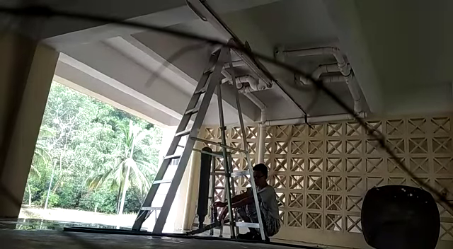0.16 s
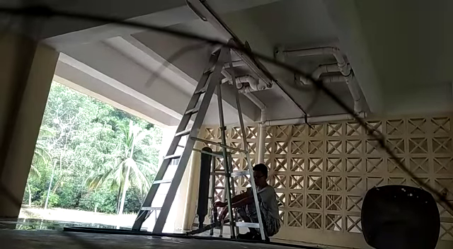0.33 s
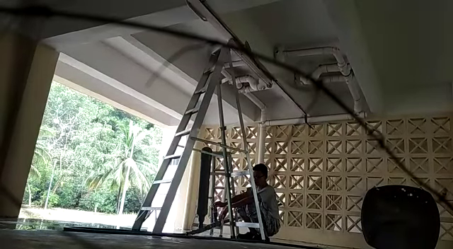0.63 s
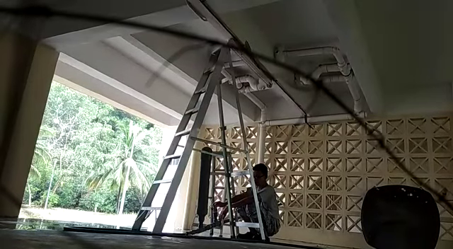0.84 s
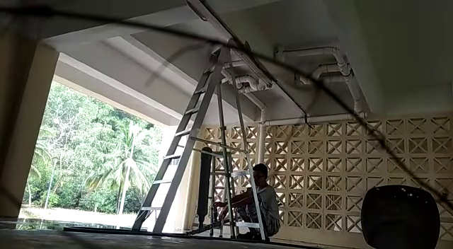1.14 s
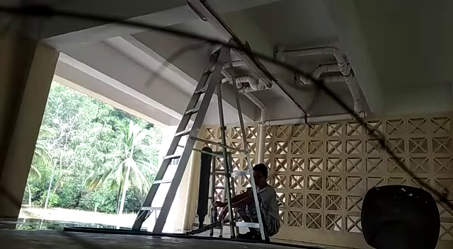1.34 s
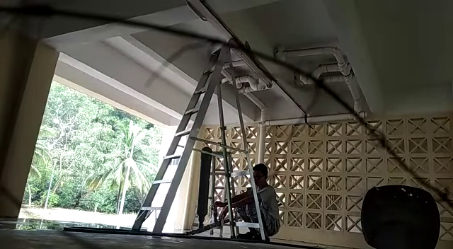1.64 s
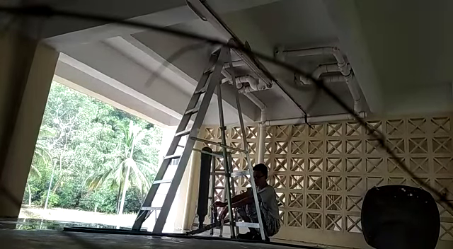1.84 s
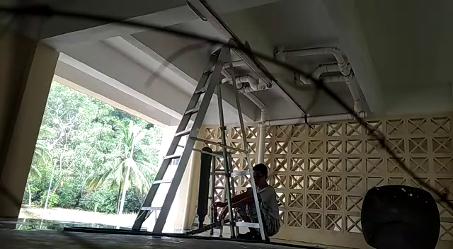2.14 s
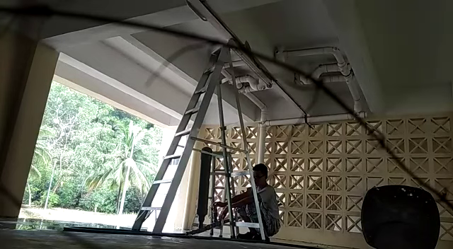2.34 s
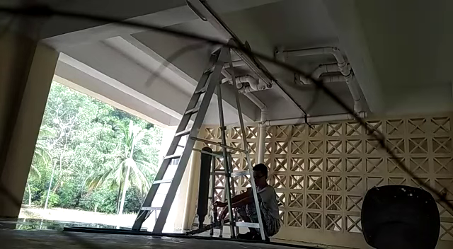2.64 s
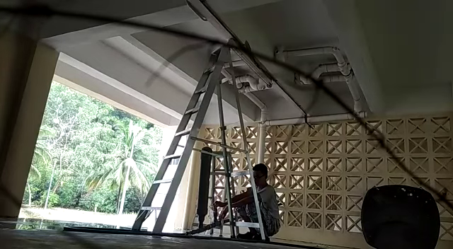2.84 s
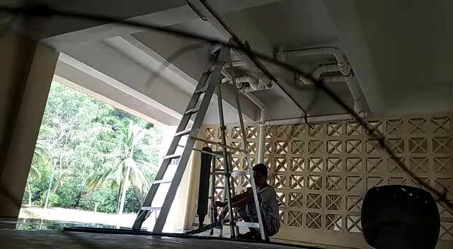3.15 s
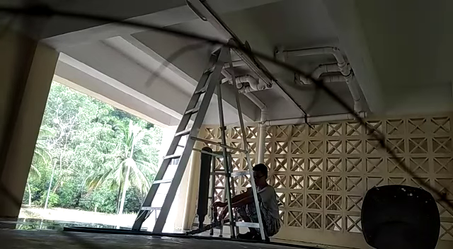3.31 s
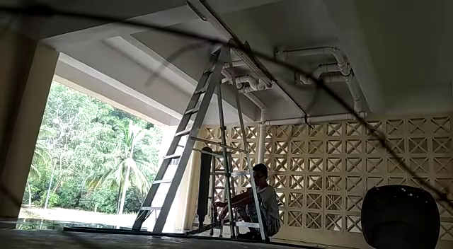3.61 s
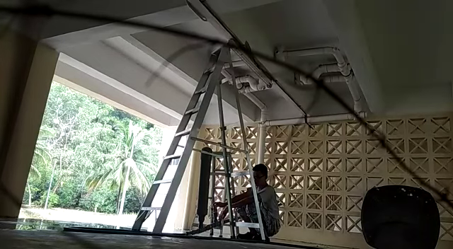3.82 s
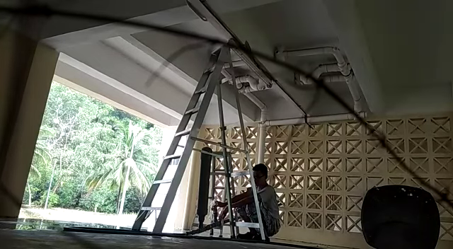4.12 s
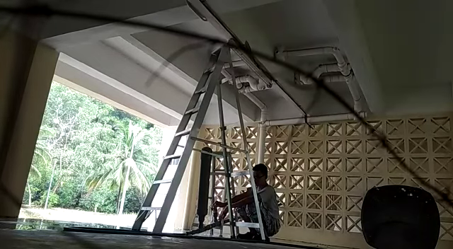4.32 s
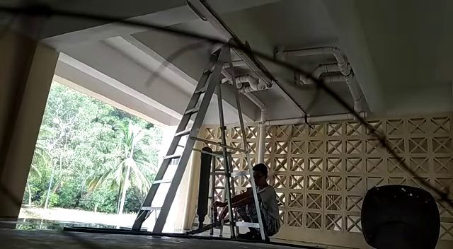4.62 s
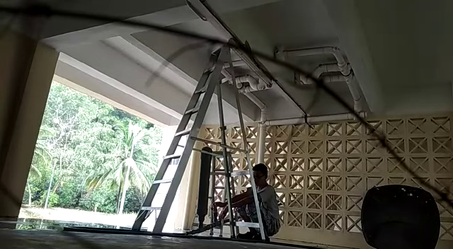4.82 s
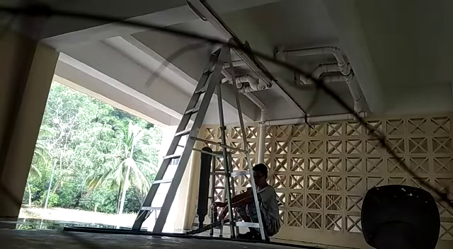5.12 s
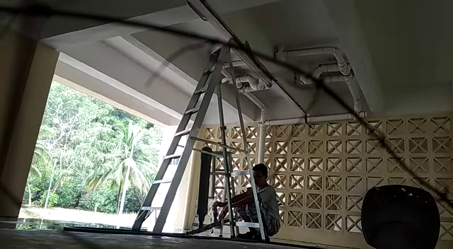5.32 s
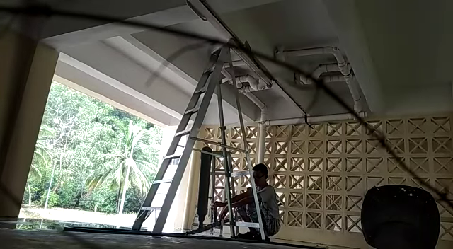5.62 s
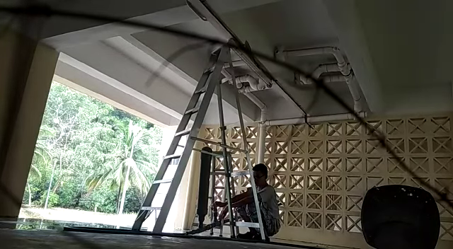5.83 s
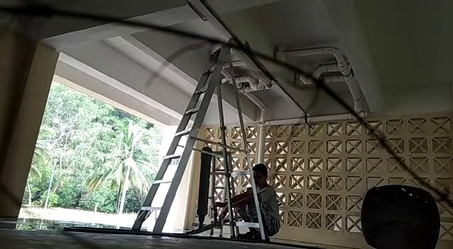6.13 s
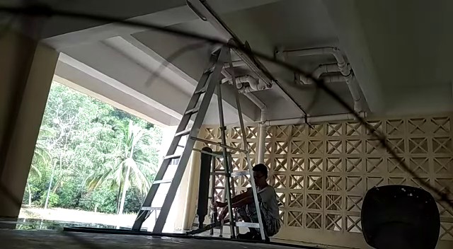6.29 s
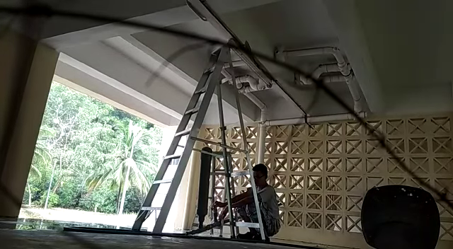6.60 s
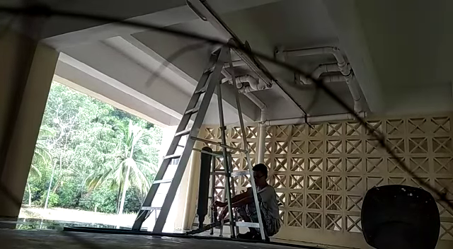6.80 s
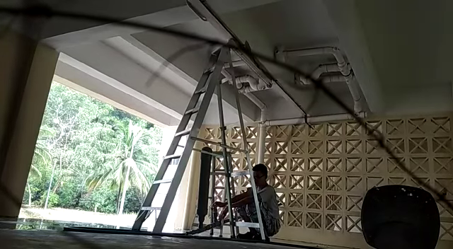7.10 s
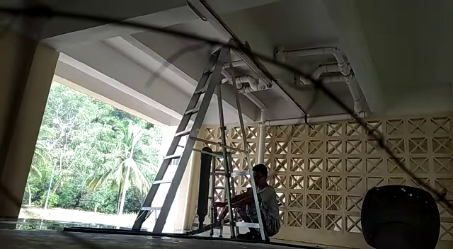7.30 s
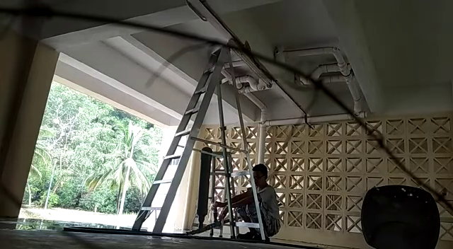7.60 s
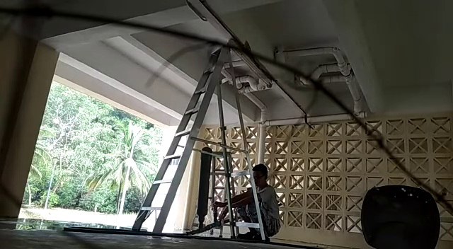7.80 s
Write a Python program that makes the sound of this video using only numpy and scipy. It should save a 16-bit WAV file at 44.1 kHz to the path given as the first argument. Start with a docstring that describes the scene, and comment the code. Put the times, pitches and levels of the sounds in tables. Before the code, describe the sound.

A small water-powered pump beats slowly and unevenly on a hard, echoing porch, each metallic valve clack followed by a splash of falling water.

```python
"""On a hard-walled porch, open to the garden, a small ram pump beats slowly and unevenly.
Its waste valve slams with a water-hammer clack, made from gritty bursts ringing the pump body.
A third of a second later a spurt splashes down as showers of random drops; some slams follow light ticks.
The porch rings after every knock, by a few distinct paths and a fading noise tail.
Coloured noise makes the garden wash, drone and breeze on the microphone; a wobbly tone is one bird peep."""
import sys
import numpy as np
from scipy import signal
from scipy.fft import rfft, irfft, next_fast_len
from scipy.io import wavfile
from scipy.ndimage import uniform_filter1d, map_coordinates

SR = 44100
rng = np.random.default_rng(int(sys.argv[2]) if len(sys.argv) > 2 else 0)


def to_wav(sig):
    """Store sig (one row per channel, or 1-D mono) as 16-bit WAV at the path in sys.argv[1].

    Samples outside -1..1 are clipped; the rate is SR.
    """
    pcm = np.clip(np.atleast_2d(sig), -1, 1) * 32767
    pcm = np.round(pcm).astype(np.int16)
    wavfile.write(sys.argv[1], SR, pcm.T)  # frames by channels


N = 350595
TIME = np.arange(N) / SR  # seconds
SIDES = np.array([[1], [-1]])  # left, right


def from_db(db):
    """Turn decibels into a gain."""
    return 10 ** (np.asarray(db) / 20)


def rms_one(x):
    """Scale to unit power."""
    return x / np.sqrt(np.mean(x ** 2) + 1e-20)


def in_time(rows):
    """Draw straight lines between the rows, giving each column a value at every sample."""
    seconds, *columns = np.transpose(rows)
    return [np.interp(TIME, seconds, column) for column in columns]


def bins(size):
    """Frequencies in Hz of the spectrum of this many samples, none below 1 Hz."""
    return np.maximum(np.fft.rfftfreq(size, 1 / SR), 1)


def at_hz(points, hz):
    """Read a table along a logarithmic frequency axis."""
    table_hz, value = np.transpose(points)
    return np.interp(np.log(hz), np.log(table_hz), value)


def bump(hz, centre_hz, width_hz):
    """Bell of height 1 around a resonance, as wide as given at half height."""
    return .5 ** ((2 * (hz - centre_hz) / width_hz) ** 2)


def cluster(hz, centre_hz, width_hz):
    """Flat-topped hump of height 1: several close resonances side by side."""
    return 1 / (1 + (2 * (hz - centre_hz) / width_hz) ** 4)


def above(hz, corner_hz):
    """Shelf that climbs from 0 to 1 around a corner."""
    return 1 / (1 + (corner_hz / hz) ** 4)


def resonate(x, db):
    """Apply a gain per frequency so that the ringing only follows the sound (minimum phase)."""
    cepstrum = irfft(np.log(from_db(db)))
    # fold the backward half onto the forward half
    cepstrum[1:len(x) // 2] *= 2
    cepstrum[len(x) // 2 + 1:] = 0
    return irfft(rfft(x) * np.exp(rfft(cepstrum)))


def add(track, s, sound):
    """Mix a sound into a track at a time in seconds."""
    start = max(0, round(s * SR))
    track[start:start + len(sound)] += sound[:N - start]


# How alike left and right are. Each row: frequency in Hz, likeness from -1 to 1.
EAR_LIKENESS = [(50, 1), (130, 1), (290, 0.87), (640, 0.59), (1400, -0.25), (3000, 0.087), (16000, 0.022)]


def diffuse(size):
    """Spectrum of stereo white noise arriving from all around, most alike in both ears in the bass."""
    alike = np.clip(at_hz(EAR_LIKENESS, bins(size)), -.99, .99)
    mid, side = rfft(rng.standard_normal((2, size)))
    shared = np.sqrt((1 + alike) / 2) * mid
    opposed = np.sqrt((1 - alike) / 2) * side * SIDES
    return shared + opposed


def noise(colour):
    """Steady stereo noise of a given colour, unit power."""
    size = next_fast_len(N)
    spectrum = diffuse(size) * from_db(at_hz(colour, bins(size)))
    return rms_one(irfft(spectrum, size)[:, :N])


# Colour of the outdoor wash. Each row: frequency in Hz, relative level in dB.
WASH_COLOUR = [(35, -56), (60, 2), (81, 2.5), (124, -8), (156, -4.5), (323, -11.5), (666, -15), (732, -17),
               (1010, -15), (1740, -26.5), (4640, -26.5), (6430, -33.5), (8920, -32.5), (14200, -30.5),
               (16000, -67)]
# Swell of the far-off drone. Each row: time in seconds, relative level in dB.
DRONE_SWELL = [(0, -69.5), (4.5, -65.5), (5.7, -56.5), (7.2, -56), (7.95, -60.5)]
# Colour of the drone. Each row: frequency in Hz, relative level in dB.
DRONE_TONE = [(40, -44), (80, -3.5), (103, -11.5), (120, -11.5), (138, -5), (180, -21), (400, -29),
              (3000, -78)]


def garden(wash_db, drone_db):
    """Steady noise makes a soft outdoor wash; low noise that swells makes a far-off drone."""
    wash = from_db(wash_db) * noise(WASH_COLOUR)
    drone = from_db(in_time(DRONE_SWELL)[0] + drone_db) * noise(DRONE_TONE)
    return wash + drone


def flutter(rate):
    """Smooth random swing of spread about 1, separate for each ear; rate in random points per second."""
    knots = rng.standard_normal((2, 400))
    return np.array([map_coordinates(ear, [TIME * rate], mode="mirror") for ear in knots])


# Strength of the breeze. Each row: time in seconds, relative level in dB, left over right in dB.
BREEZE_SWELL = [(0.0, -40, 10), (0.95, -41.5, 12), (1.3, -32.5, 12.5), (1.55, -32.5, 2), (1.82, -44.5, 8.5),
                (2.25, -35, 9), (3.0, -42, 3), (3.85, -45, 4), (4.4, -36.5, 3), (4.7, -41, 6),
                (5.0, -39.5, -3), (5.45, -48.5, 0), (5.85, -47.5, 3), (6.35, -35.5, 7), (6.85, -47, 0.5),
                (7.95, -51, 1)]
# Colour of the breeze. Each row: frequency in Hz, relative level in dB.
BREEZE_TONE = [(15, -6), (35, 3.5), (70, -5), (110, -7.5), (200, -22.5), (400, -44), (1000, -42),
               (4000, -77)]
# Sharp buffets. Each row: peak in seconds, relative level in dB, half length in seconds,
# left over right in dB.
SHARP_BUFFETS = [(0.03, -37.5, 0.11, 12), (0.59, -30.5, 0.017, 13), (1.021, -30.5, 0.009, 20),
                 (1.222, -27, 0.014, 19.5), (1.29, -35.5, 0.045, 17), (2.225, -32, 0.012, 16),
                 (4.644, -31.5, 0.018, 19), (4.989, -30, 0.011, -2), (6.154, -30, 0.015, 7),
                 (6.458, -33, 0.015, 17)]
# Colour of the buffets. Each row: frequency in Hz, relative level in dB.
BUFFET_TONE = [(20, 14), (70, 7), (170, 1.5), (310, -10), (520, -34), (1500, -35), (4000, -50),
               (16000, -80)]
EDDIES_PER_S, EDDY_DB = 6.7, 2  # rate and depth of the flutter at each microphone port


def breeze(level_db, buffet_db):
    """Air presses on each port apart, swelling slowly and fluttering with eddies; buffets reach higher."""
    swell_db, pan_db = in_time(BREEZE_SWELL)
    pressure = np.array([noise(BREEZE_TONE)[0] for _ in SIDES])
    strength_db = level_db + swell_db + SIDES * pan_db / 2 + EDDY_DB * flutter(EDDIES_PER_S)
    rumble = from_db(strength_db) * pressure
    gusts = np.zeros((2, N))
    for s, peak_db, half_s, side_db in SHARP_BUFFETS:
        gusts += from_db(peak_db + SIDES * side_db / 2) * np.exp(-((TIME - s) / half_s) ** 2)
    return rumble + gusts * from_db(buffet_db) * noise(BUFFET_TONE)


# Colour of water on the floor. Each row: frequency in Hz, relative level in dB.
WATER_COLOUR = [(100, -28), (300, -1), (600, -1), (1150, 3), (1450, -8), (2100, -0.5), (2800, -4),
                (3800, -2), (6000, -5), (10500, -6.5), (13000, -6.5), (16000, -15.5)]


def shower(db, treble_db, rise, fall, slap, drops_per_s=3000, spread_db=4.0, size=32768):
    """Water lands with a slap, then as a swelling and thinning shower of drops that come in clumps."""
    t, hz = np.arange(size) / SR, bins(size)
    flow = np.minimum(t / rise, 1) * np.exp(-np.maximum(t - rise, 0) / fall)
    flow += slap * np.exp(-t / 0.0048)
    clumps = from_db(3 * rms_one(uniform_filter1d(rng.standard_normal(size), size=256)))
    # a few drops are much bigger than the rest
    sizes = rng.standard_normal(size) * from_db(spread_db * np.minimum(rng.exponential(1, size), 4))
    landing = rng.random(size) < drops_per_s / SR
    drops = rms_one(flow * clumps * sizes * landing) / np.sqrt(size)  # unit energy
    return resonate(drops, db + at_hz(WATER_COLOUR, hz) + treble_db * above(hz, corner_hz=4330))


# Spurts coming down. Each row: lump of water lands in seconds, relative level in dB, treble lift in dB,
# rise in seconds, how many seconds earlier the spray starts, relative level of the spray in dB.
FALLING_SPURTS = [(0.0, -4.5, -3, 0.00093, 0, -20), (0.60, -11.5, 1, 0.018, 0.1, -20),
                  (1.797, -6.5, 4.5, 0.0077, .11, -8.5), (3.089, 3, -4, 0.0048, 0.18, -9),
                  (4.486, 2, -2.5, 0.012, 0.13, -7), (5.688, 0.5, -4.5, 0.012, .16, -6),
                  (6.29, -22, 10, 0.016, 0.088, -13), (6.743, -10, 5, .01, 0.069, -4.5)]
LUMP_FALL_S, LUMP_SLAP = 0.025, 0.75  # thinning time; slap relative to the shower
SPRAY_RISE_S, SPRAY_FALL_S, SPRAY_TREBLE_DB = 0.021, 0.088, 3
# Stray drips. Each row: start in seconds, relative level in dB.
STRAY_DRIPS = [(3.716, -32), (4.88, -36.5), (5.19, -34)]
DRIP_RISE_S, DRIP_FALL_S, DRIP_SLAP, DRIP_TREBLE_DB = .004, .017, 2.5, 12


def splashes():
    """Bright spray patters down ahead of the lumps of water; a few drips fall between strokes."""
    out = np.zeros(N)
    for s, db, treble_db, rise, lead, spray_db in FALLING_SPURTS:
        add(out, s - lead, shower(spray_db, SPRAY_TREBLE_DB, SPRAY_RISE_S, SPRAY_FALL_S, slap=0.83))
        add(out, s, shower(db, treble_db, rise, LUMP_FALL_S, LUMP_SLAP))
    for s, db in STRAY_DRIPS:
        add(out, s, shower(db, DRIP_TREBLE_DB, DRIP_RISE_S, DRIP_FALL_S, DRIP_SLAP))
    return out


def contact(length_s, evenness, size=8192):
    """Metal grinding home on its seat: a gritty burst of a few milliseconds, unit energy."""
    t = np.arange(size) / SR
    grit = rng.standard_normal(size) * rng.exponential(1, size)
    burst = grit * np.exp(-(2 * t / length_s - 1) ** 2) * (t < 2 * length_s)
    # evenness 1 would flatten the spectrum fully
    unevenness_db = 20 * np.log10(abs(rfft(burst)) + 1e-9)
    burst = resonate(burst, -np.clip(evenness, 0, 1) * unevenness_db)
    return rms_one(burst) / np.sqrt(size)


# Valve slams. Each row: start in seconds, relative level in dB, thud lift in dB, treble lift in dB,
# water cavity in Hz, its width in Hz, its lift in dB, hollow in Hz, its lift in dB,
# crack in Hz, its lift in dB, metal chink in Hz, its lift in dB.
VALVE_SLAMS = [(0.304, -11, 1, -3, 1250, 457, 16, 2900, -4, 2260, 2, 11700, 4),
               (1.476, -3, 1, -1.5, 1140, 300, 0.5, 2750, -16, 1920, 1.5, 12100, -1),
               (2.756, -1.5, 1, -4.5, 1110, 300, -1, 2500, -3, 2800, 5, 10100, 5.5),
               (4.159, -3, 2.5, -0.5, 734, 400, 0.5, 2830, -11, 3320, 5, 10200, 3.5),
               (5.348, 0, -4, -8.5, 1117, 254, 14.5, 3040, -10.5, 2880, 8.5, 10800, -4),
               (5.981, -11.5, 7, -1, 1100, 260, 10, 2530, -6, 3120, 4, 10900, -4),
               (6.427, -4.5, 3, 1, 750, 297, 0.5, 2770, -12, 2170, 7, 11700, 0),
               (7.701, -2, 3, -4, 1210, 240, 8, 2750, -3, 6300, 6.5, 10250, 10)]
# Pump body under a slam. Each row: frequency in Hz, relative level in dB.
BODY_COLOUR = [(60, -16.5), (120, 4), (175, 13.5), (290, 12), (390, 8), (600, 9), (950, 11), (1500, 6),
               (2500, 8.5), (4500, 3), (8500, -0.5), (11000, 4.5), (13500, 7.5), (16000, -4)]
# Resonances of the body. Each row: frequency in Hz, width in Hz, lift in dB.
BODY_RINGS = [(306.6, 6.6, 6.5), (467.7, 11, 9), (673, 120, 6), (1526, 55, 7), (1860, 310, 5),
              (3600, 690, 2), (5900, 1400, 4), (7000, 480, 4)]


def clacks():
    """Each slam rings the pump body; trapped air and the way the valve seats colour it anew each time."""
    out = np.zeros(N)
    for (s, db, thud_db, treble_db, cavity_hz, cavity_width_hz, cavity_db,
         hollow_hz, hollow_db, crack_hz, crack_db, chink_hz, chink_db) in VALVE_SLAMS:
        slam = contact(length_s=.0036, evenness=.75)
        hz = bins(len(slam))
        colour = at_hz(BODY_COLOUR, hz)
        for ring_hz, width_hz, lift_db in BODY_RINGS:
            colour += lift_db * bump(hz, ring_hz, width_hz)
        colour += thud_db * (1 - above(hz, corner_hz=950))
        colour += treble_db * above(hz, corner_hz=4020)
        colour += cavity_db * cluster(hz, cavity_hz, cavity_width_hz)
        colour += hollow_db * bump(hz, hollow_hz, width_hz=430)
        colour += crack_db * bump(hz, crack_hz, width_hz=310)
        colour += chink_db * cluster(hz, chink_hz, width_hz=800)
        add(out, s, resonate(slam, db + colour))
    return out


# Valve ticking open. Each row: start in seconds, relative level in dB, lift of the stem's ring in dB.
VALVE_TICKS = [(2.547, -10, 3), (2.575, -10.5, 7), (3.888, -2.5, 4.5), (5.108, -2.5, 11.5), (5.15, -13, 7),
               (7.453, -2.5, 9)]
# Colour of a tick. Each row: frequency in Hz, relative level in dB.
TICK_COLOUR = [(200, -37), (900, -2.5), (1600, -7), (2800, -15.5), (4000, -9), (6500, -21), (8500, -31),
               (16000, -31)]


def ticks():
    """The valve drops open, touches its stop lightly and its stem rings."""
    out = np.zeros(N)
    for s, db, ring_db in VALVE_TICKS:
        touch = contact(length_s=0.0048, evenness=0.73)
        hz = bins(len(touch))
        stem = cluster(hz, centre_hz=3970, width_hz=440)
        add(out, s, resonate(touch, db + at_hz(TICK_COLOUR, hz) + ring_db * stem))
    return out


# The bird's peep. Each row: time in seconds, pitch in Hz, relative level in dB.
BIRD_PEEP = [(3.555, 2790, -72), (3.588, 2620, -58), (3.62, 2590, -61), (3.65, 2580, -85)]


def bird():
    """One thin, slightly falling whistle: a sine frayed by a little random wobble of its pitch."""
    pitch, db = in_time(BIRD_PEEP)
    wobble = 45 * rms_one(uniform_filter1d(rng.standard_normal(N), size=220))  # Hz
    singing = (TIME > BIRD_PEEP[0][0]) & (TIME < BIRD_PEEP[-1][0])
    phase = 2 * np.pi * np.cumsum(pitch + wobble) / SR
    return from_db(db) * np.sin(phase) * singing


# First paths across the porch, the ceiling's the brightest.
# Each row: delay in seconds, relative left level in dB, relative right level in dB, treble lift in dB.
FIRST_PATHS = [(0, -12.5, -14, 2), (.0074, -14, -19, 9), (.0126, -18, -24, 6)]
# How long the porch rings. Each row: frequency in Hz, seconds to fall by 60 dB.
RING_TIME = [(100, 1.27), (350, 0.89), (1000, 1.41), (2500, 0.84), (5000, 0.92), (9000, 0.81), (16000, 0.4)]
# Lean between the ears. Each row: frequency in Hz, left over right in dB.
EAR_BALANCE = [(150, -1), (450, 0.5), (720, -4), (1250, 2), (4000, -0.5), (6000, 5.5), (8500, 9.5),
               (10500, 15), (13000, 7.5), (16000, 0)]


def porch(x, build_s, size=65536):
    """Hard walls give a few distinct paths, then a diffuse tail whose highest treble dies first."""
    t, hz = np.arange(size) / SR, bins(size)
    field, response = diffuse(size), np.zeros((2, size))
    # the tail is built from overlapping bands, each with its own fade
    centres = np.geomspace(100, 16000, 12)
    for centre, weights in zip(centres, np.eye(len(centres))):
        decay = from_db(-60 * t / at_hz(RING_TIME, centre)) * (1 - np.exp(-t / build_s))
        band = irfft(field * np.interp(np.log(hz), np.log(centres), weights))
        response += band * decay / np.linalg.norm(decay)
    # short waves beam along the first paths and reach mostly the left port
    for delay, left_db, right_db, lift_db in FIRST_PATHS:
        arrival = signal.unit_impulse(size, round(delay * SR))
        bright = resonate(arrival, lift_db * above(hz, corner_hz=8100))
        response += from_db([[left_db], [right_db]]) * bright
    lean_db = at_hz(EAR_BALANCE, hz) / 2
    response = [resonate(ear, side * lean_db) for ear, side in zip(response, SIDES)]
    return signal.fftconvolve(x[None], np.array(response))[:, :N]


def scene():
    """Pump and bird sound through the porch, over garden and breeze."""
    outside = garden(wash_db=-55.0, drone_db=2.0) + breeze(level_db=-7.0, buffet_db=-9.0)
    sources = splashes() + clacks() + ticks() + bird()
    return from_db(-0.99) * porch(sources, build_s=0.0036) + outside


def record(dry):
    """A steep low-pass filter cuts the top above 16 kHz."""
    steep_cut = signal.ellip(10, .1, 80, 16000, fs=SR, output="sos")
    return signal.sosfilt(steep_cut, dry)


dry = scene()
out = record(dry)
to_wav(out)
```